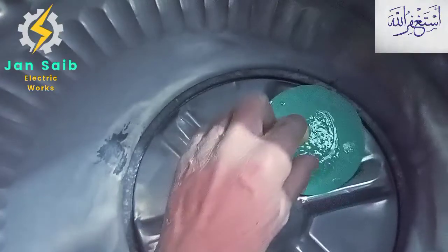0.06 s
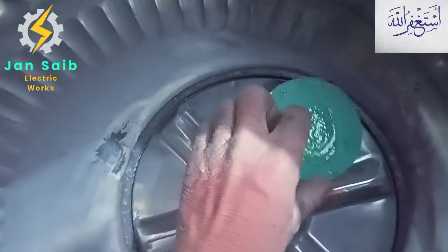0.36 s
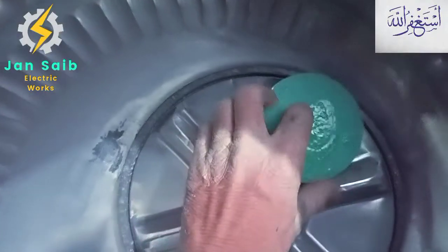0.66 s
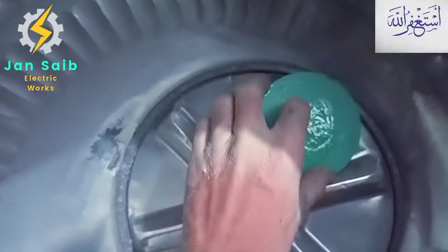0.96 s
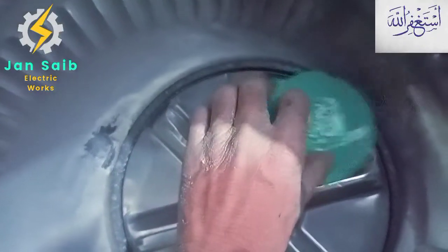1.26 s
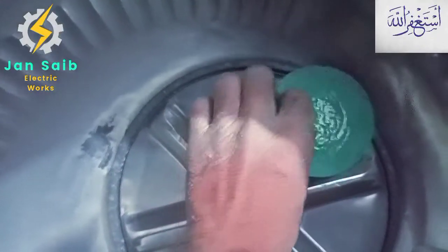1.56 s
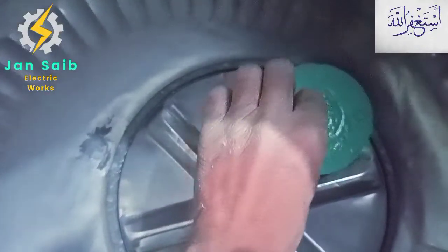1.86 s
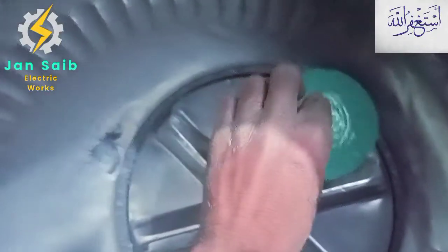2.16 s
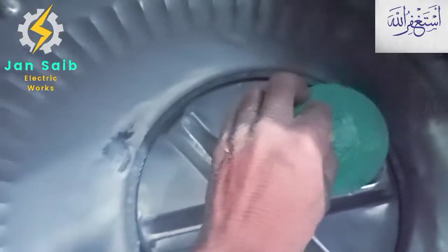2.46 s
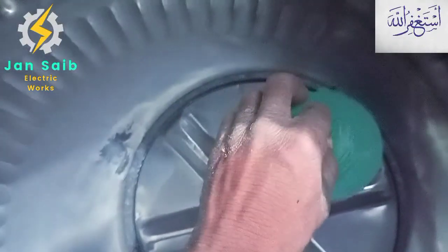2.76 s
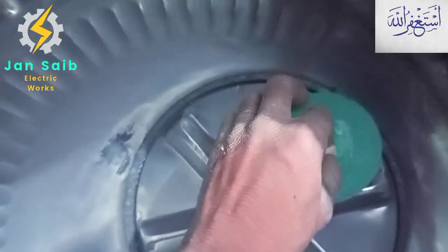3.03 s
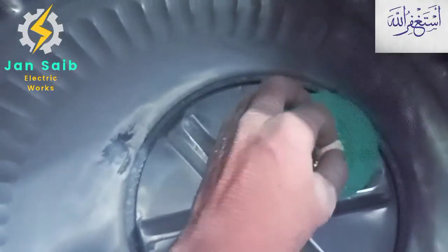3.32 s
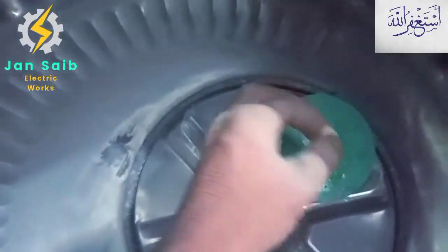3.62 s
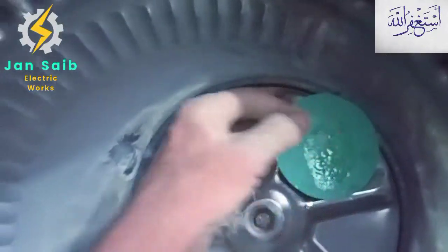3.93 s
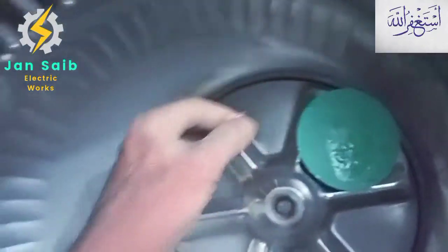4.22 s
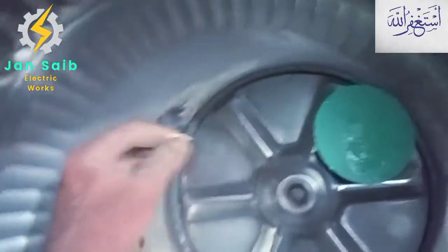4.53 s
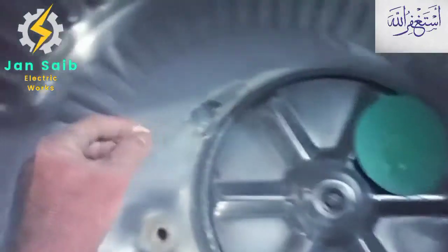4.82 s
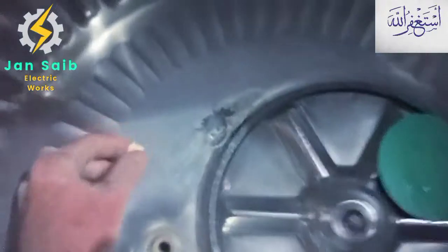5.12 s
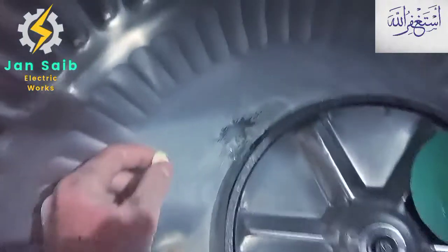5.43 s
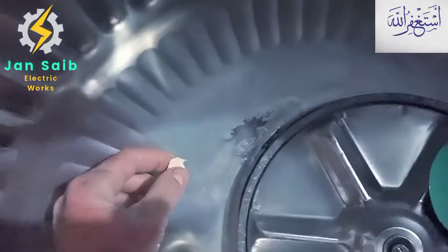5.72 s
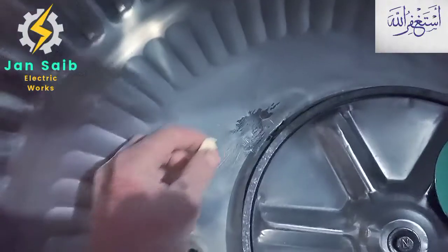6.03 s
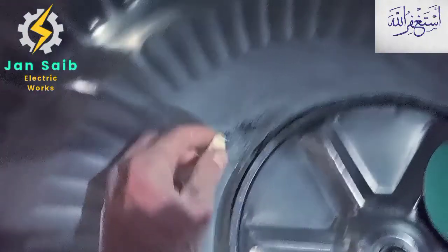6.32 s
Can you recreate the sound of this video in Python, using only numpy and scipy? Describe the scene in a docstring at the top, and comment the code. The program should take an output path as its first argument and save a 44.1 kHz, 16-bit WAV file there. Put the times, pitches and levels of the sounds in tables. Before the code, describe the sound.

Inside a washing machine drum, a hand shifts a plastic lid over the metal floor. It knocks, bounces and scrapes irregularly, with tiny groans, for about three seconds, ending in a quick clatter. The fingers slide off with a soft hiss and there is one sharp scuff. Then they quietly knead putty and press it on the metal, which booms softly. The microphone is close.

```python
"""Inside a washing machine drum, one close microphone. A hand shifts a plastic tub lid on the metal
floor: knocks and bounces ring the modes of lid, floor and rim; stick-slip makes it scrape and groan.
The fingers slide off with a soft hiss and there is one sharp scuff. They then knead epoxy putty
and press it on the metal, which booms softly."""
import sys
import numpy as np
from scipy import signal
from scipy.fft import rfft, irfft, next_fast_len
from scipy.io import wavfile

SR = 44100
rng = np.random.default_rng(int(sys.argv[2]) if len(sys.argv) > 2 else 0)


def store_pcm(level_fs):
    """Save levels as 16-bit WAV."""
    pcm = np.round(np.clip(level_fs, -1, 1) * 32767).astype(np.int16)
    wavfile.write(sys.argv[1], SR, np.atleast_2d(pcm).T)


N = 290178
TIME_S = np.arange(N) / SR
AGE_S = TIME_S[:SR * 6 // 10]  # time within one event

# Background spectrum (frequency [Hz], density [dB])
AIR_SPECTRUM = [(18, -37), (30, -9.5), (145, 6), (221, -5.5), (473, -3), (554, -9.5), (913, -18.5),
                (1160, -6.5), (2830, -16), (5900, -11.5), (7270, -24), (9970, -12), (16000, -30)]
# Floor under the hand, low to high (frequency [Hz], width [Hz], gain [dB])
FLOOR_THRUM = [(75.96, 18, 0)]
FLOOR_BOOM = [(110.7, 11, -2.5), (146.6, 31, 0), (176.5, 38, -1)]
FLOOR_RUMBLE = [(261.5, 15.9, 1.5), (378.4, 78, -4), (411, 81, -4.5), (489.75, 34, 6.5), (595, 99, -14),
                (705, 76, -6.5)]
# Hand leaning (start [s], end [s], first [dB], last [dB], thrum re boom [dB], rumble re boom [dB])
HAND_PRESSES = [(0.808, 0.977, -43, -68.5, -2.5, -10.5), (1.368, 1.6, -47.5, -67.5, 2, -20),
                (3.87, 3.945, -69, -66, -3, -8.5), (4.175, 4.301, -60.5, -57, -1.5, -10.5),
                (4.336, 4.58, -37, -45, -17.5, -7), (4.619, 4.803, -58, -61, -7.5, -35),
                (4.935, 5.246, -46, -53, -13.5, -8), (5.32, 5.55, -58.5, -63.5, -6.5, -15),
                (5.687, 5.912, -75.5, -66, -5.5, -9), (6.099, 6.35, -54, -63, 1.5, -6.5),
                (6.4, 6.587, -64.5, -69, -6.5, -12.5)]
# Soft pushes on the floor (time [s], level [dB])
HAND_PUSHES = [(4.316, -34.5), (4.92, -33), (5.32, -48), (6.199, -48), (6.301, -49.5)]
# Sliding skin (frequency [Hz], density [dB])
SKIN_SPECTRUM = [(290, -25.5), (500, -6), (640, -28.5), (708, 1.5), (880, -5), (1140, -11), (1300, -13),
                 (1440, -11.5), (2190, 0), (4400, -8), (6140, -16.5), (7530, -26), (16000, -28.5)]
# Drum cavity (frequency [Hz], width [Hz], gain [dB])
CAVITY_RESONANCES = [(711.1, 29, -2.5), (1003.8, 29, 9), (1177, 70, 3), (1282, 238, 5), (1539, 130, 3),
                     (1750, 167.4, -2), (1891.7, 140, -8), (2067.5, 54.3, -7.5), (2584, 170, -12),
                     (3441, 296, -15.5), (4660, 150, -14.5), (5593, 120, -8.5), (6007, 270, -9.5),
                     (10086, 240, -2.5)]
# Skin on the lid, fingers in putty (start [s], end [s], first [dB], last [dB], brightness [dB])
SKIN_RUBS = [(2.388, 2.42, -48, -54.5, 4), (2.43, 2.55, -70.5, -62.5, 0.5), (2.63, 2.83, -53.5, -68.5, 1),
             (3.44, 3.54, -50.5, -59, 3), (3.69, 3.77, -58, -42.5, 6.5), (3.745, 3.83, -41.5, -41, -26),
             (5.95, 5.98, -74.5, -71, 16)]
PUTTY_SQUEEZES = [(3.95, 4.11, -59, -61, -4.5), (4.32, 4.44, -58.5, -65, -5), (4.5, 4.57, -56, -64, -26),
                  (4.69, 4.89, -75.5, -78, 6.5), (4.915, 5.19, -53.5, -59, -3),
                  (5.055, 5.08, -42, -56.5, 2), (5.25, 5.44, -73, -73, 1.5), (5.63, 5.84, -69, -75, 6),
                  (5.98, 6.25, -72, -69.5, 7), (6.28, 6.56, -73.5, -81.5, 1)]
# Scuff noise (frequency [Hz], density [dB])
SCUFF_SPECTRUM = [(410, -24.5), (700, -12.5), (798, -17), (958, -4.5), (1300, -16.5), (2050, -5),
                  (2920, -10), (4670, -5), (6570, -3), (7590, -14.5), (9600, -3.5), (13500, -17.5),
                  (16000, -14.5)]
# Jerks of the scuff (time [s], gain [dB])
SCUFF_JERKS = [(4.149, -28), (4.163, -27)]
# Lid brushing the rim (start [s], release [s], frequency [Hz], gain [dB])
RIM_SQUEAL = (3.5, 3.5, 4025, -33.5)
# Stick-slip of the lid's edge (start [s], end [s], first pitch [Hz], last pitch [Hz], level [dB])
EDGE_GROANS = [(0.304, 0.328, 768.7, 777, -33.5), (0.392, 0.423, 771, 747, -32.5),
               (1.171, 1.177, 2074, 1984, -34), (1.247, 1.266, 770.3, 787.2, -30.5),
               (1.405, 1.424, 794, 745.5, -41.5), (1.585, 1.613, 770.2, 760, -33.5),
               (1.62, 1.714, 767.3, 751, -45.5), (2.071, 2.122, 773.7, 805.4, -45),
               (2.869, 2.954, 560.7, 632.8, -44.5)]
# Lid (frequency [Hz], width [Hz], gain [dB])
LID_RESONANCES = [(1200, 110, -7), (1666, 110, -4), (1917.2, 130, -3), (2073, 280, 0), (3174, 810, -14),
                  (3467.3, 170, -9), (3694, 150, -9.5), (4045, 170, -7), (4271, 200, -7), (4943, 380, -16),
                  (5310, 150, -11), (6020, 150, -1.5), (6626, 300, -8.5), (6940, 140, -9), (8531, 150, -10),
                  (9840, 750, -10.5), (11110, 660, -15), (12300, 450, -24), (15200, 1200, -22.5)]
# Lid on metal (start [s], end [s], first [dB], last [dB], treble re middle [dB], floor shudder [dB])
LID_DRAGS = [(0.0, 0.026, -21, -42.5, -2, -46), (0.083, 0.292, -49, -41.5, -2.5, -48),
             (0.328, 0.421, -54, -40, -0.5, -51.5), (0.501, 0.652, -42, -46, 1, -54),
             (0.832, 0.954, -59.5, -53, -3, -58), (1.038, 1.157, -47, -41.5, 1.5, -84),
             (1.178, 1.184, -17.5, -35.5, -2.5, -77.5), (1.301, 1.427, -33, -40.5, -1, -49),
             (1.575, 1.762, -43, -52, -1.5, -70.5), (1.817, 1.878, -66, -84.5, -25, -47),
             (1.971, 1.988, -58.5, -62, 5, -86), (1.996, 2.038, -42, -48.5, 6, -61),
             (2.069, 2.147, -37, -40.5, 5.5, -86.5), (2.193, 2.314, -46, -72, 1.5, -88),
             (2.56, 2.577, -49.5, -46, 11, -82), (2.863, 2.966, -53, -28.5, -3, -72)]
# Lid catching and jumping (time [s], surge re drag [dB])
LID_CATCHES = [(0.19, 3.5), (0.246, 5), (0.608, 2.5), (1.098, 9), (1.127, 2.5), (1.593, 3), (1.726, 0),
               (2.006, 15), (2.104, -6), (2.12, 2.5), (2.213, 6.5), (2.273, 11), (2.31, 12.5)]
# Dense small modes of the metal sheet (frequency [Hz], density [dB])
SHEET_SPECTRUM = [(35, -48), (60, -17), (227, -18), (363, -8), (651, -19.5), (785, -9.5), (1060, -19),
                  (1660, -4), (2770, -22.5), (4120, -15.5), (5590, -12), (6140, -15.5), (7400, -16),
                  (14900, -21.5), (16000, -25)]
# Lid and floor together; steel rim (frequency [Hz], level [dB], t60 [s])
BODY_MODES = [(79.3, -26, 0.9), (126, -18, 0.44), (165.2, -21, 0.32), (360.5, -8, 0.29), (484, -10.5, 0.22),
              (533.1, -15, 0.22), (748.4, -9, 0.23), (794, -1.5, 0.11), (953.6, -11.5, .14),
              (1213.5, -7.5, 0.15), (1291, 0, .1), (1530, -19.5, 0.052), (1612, -7, 0.19),
              (1710.7, 2.5, .13), (1898, -6, 0.28), (2094, -5, 0.04), (1936, -2.5, 0.099),
              (2058, -3.5, 0.067), (2378.5, -11, 0.26), (3490, -3.5, 0.062), (3930, -17, 0.14),
              (3957, -3, .06), (4695, -2, 0.079), (6050, -11.5, 0.24), (6186, 3.5, 0.041),
              (8510, -3.5, 0.079), (9560, -7.5, 0.07), (9430, -7, 0.064), (11000, -6, 0.054)]
RIM_MODES = [(1670, 0, .15), (4023, -4, .18), (6122, -2, .23), (6145, -3, .15), (6310, -3, .13),
             (6757, -3, .12), (6800, -7, .1)]
# Knocks reaching the rim (time [s], level [dB])
RIM_KNOCKS = [(2.574, -46), (3.186, -27), (3.25, -24), (3.274, -21.5), (3.369, -23)]
# Lid on floor (time [s], level [dB], bass re middle [dB], treble re middle [dB], bounces [count])
LID_KNOCKS = [(0.023, -24, -11, 2.5, 0), (0.035, -22.5, -9.5, -0.5, 0), (0.302, -30.5, -7.5, -1, 0),
              (0.368, -34.5, -6.5, 0.5, 1), (0.463, -19, -16.5, 0.5, 1), (0.541, -38.5, -4.5, 3.5, 0),
              (0.556, -28.5, -19, -4.5, 0), (0.667, -23.5, -7, -4, 1), (0.688, -21.5, -17.5, 0.5, 2),
              (0.782, -21, -14.5, -5.5, 0), (0.799, -30.5, -3.5, -12, 0), (0.962, -50.5, -7.5, 4, 0),
              (0.992, -56.5, -8, 6, 0), (1.208, -24.5, -13.5, 3, 0), (1.225, -26, -7.5, -3.5, 1),
              (1.254, -24, -7.5, -5, 1), (1.797, -38, -8, -9.5, 1), (2.573, -53, -25.5, 14, 0),
              (2.619, -39, -29.5, -5, 0), (2.785, -61.5, -12, 3, 0), (2.971, -27.5, -11.5, -10, 0),
              (2.986, -22, -14, -8, 1), (3.11, -44, -21.5, 1, 0), (3.127, -41, -21.5, 0.5, 0),
              (3.156, -47.5, -9, -2, 0), (3.184, -25, -8, 3, 0), (3.202, -24, -11.5, -4.5, 0),
              (3.249, -22, -20, 1, 0), (3.262, -22, -16.5, 1, 1), (3.359, -28.5, -6.5, 1, 0),
              (3.37, -23.5, -15.5, -1.5, 1)]


def from_db(db):
    """Decibels to gain."""
    return 10 ** (np.asarray(db) / 20)


def unit_rms(x):
    """Scale to rms 1."""
    return x / np.sqrt(np.mean(x ** 2) + 1e-20)


def unit_attack(x):
    """Scale to rms 1 over the first 20 ms."""
    return x / np.sqrt(np.mean(x[:SR // 50] ** 2) + 1e-20)


def decay(t60_s):
    """Exponential envelope."""
    return from_db(-60 * AGE_S / t60_s)


def band(x, low_hz, high_hz, order=3):
    """Causal band-pass."""
    edges_hz = [low_hz, min(high_hz, .48 * SR)]
    return signal.sosfilt(signal.butter(order, edges_hz, "band", fs=SR, output="sos"), x)


def noise(spectrum, size=len(AGE_S)):
    """Shaped noise, rms 1."""
    hz, db = np.transpose(spectrum)
    padded = next_fast_len(size)
    bins_hz = np.fft.rfftfreq(padded, 1 / SR)
    gain = from_db(np.interp(np.log(bins_hz + 1), np.log(hz), db))
    return unit_rms(irfft(rfft(rng.standard_normal(padded)) * gain, padded)[:size])


def drift(rate_hz):
    """Slow random curve, spread about 1."""
    knots = rng.standard_normal(4000)
    return np.interp(TIME_S * rate_hz, np.arange(len(knots)), knots)


def resonate(x, resonances, order=1):
    """Parallel resonators (frequency [Hz], width [Hz], gain [dB]), signs alternating."""
    out = 0
    for k, (hz, width_hz, db) in enumerate(resonances):
        r = np.exp(-np.pi * width_hz / SR)
        section = [(1 - r * r) / 2, 0, (r * r - 1) / 2, 1, -2 * r * np.cos(2 * np.pi * hz / SR), r * r]
        out = out + (-1) ** k * from_db(db) * signal.sosfilt([section] * order, x)
    return out


def moving_contact(x, resonances, spread_db, rate_hz):
    """A travelling contact varies the drive of each resonance."""
    return sum(resonate(x, [row], order=2) * from_db(spread_db * drift(rate_hz)) for row in resonances)


def add(out, time_s, sound):
    """Mix in at time_s."""
    start = max(round(time_s * SR), 0)
    out[start:start + len(sound)] += sound[:N - start]


def stroke(start_s, end_s, first_db, last_db, attack_s, release_t60_s):
    """Gain of one movement: attack, dB ramp, release."""
    attack = 1 - np.exp(-np.maximum(TIME_S - start_s, 0) / attack_s)
    ramp_db = np.interp(TIME_S, [start_s, end_s], [first_db, last_db])
    release_db = 60 * np.maximum(TIME_S - end_s, 0) / release_t60_s
    return attack * from_db(np.maximum(ramp_db - release_db, -200))


def friction(slips_per_s, size_db, clump_db, clump_hz):
    """Tiny slips of unequal size, in clumps."""
    slips = (rng.random(N) < slips_per_s / SR) * rng.choice([-1, 1], N)
    sizes_db = size_db * np.minimum(rng.exponential(1, N), 4) + clump_db * drift(clump_hz)
    return unit_rms(slips * from_db(sizes_db)) + 1e-18


def air(level_db=-72):
    """Faint steady background noise."""
    return from_db(level_db) * noise(AIR_SPECTRUM, N)


def pressing():
    """Hand judder and soft pushes set the floor booming."""
    out = np.zeros(N)
    judder = friction(slips_per_s=1200, size_db=2, clump_db=1.5, clump_hz=30)
    thrum, boom, rumble = (
        unit_rms(resonate(judder, floor, order=2) + from_db(-10) * resonate(judder, floor))
        for floor in (FLOOR_THRUM, FLOOR_BOOM, FLOOR_RUMBLE))
    for *ramp, thrum_db, rumble_db in HAND_PRESSES:
        gain = stroke(*ramp, attack_s=.0095, release_t60_s=.395)
        out += gain * (from_db(thrum_db) * thrum + boom + from_db(rumble_db) * rumble)
    force = AGE_S * np.exp(-AGE_S / .00158)
    thud = unit_attack(band(resonate(force, FLOOR_BOOM), 70, 260, order=2))
    for time_s, db in HAND_PUSHES:
        add(out, time_s, from_db(db) * thud)
    return out


def wall_echo(x, t60_s, wet_db):
    """The metal walls add a short, dense echo."""
    response = rng.standard_normal(len(AGE_S)) * decay(t60_s)
    echo = signal.fftconvolve(x, response / np.linalg.norm(response))[:N]
    return unit_rms(x + from_db(wet_db) * echo)


def skin_and_putty():
    """Fine sliding hiss rings in the cavity; sticky putty has more top than dry skin."""
    out = np.zeros(N)
    slide = noise(SKIN_SPECTRUM, N) * from_db(3.87 * drift(rate_hz=70))
    cavity = moving_contact(slide, CAVITY_RESONANCES, spread_db=2.5, rate_hz=14)
    hiss = wall_echo(cavity + from_db(-10) * slide, t60_s=.11, wet_db=1)
    middle, upper, top = (unit_rms(band(hiss, *edges_hz))
                          for edges_hz in [(720, 2200), (2200, 6500), (6500, 17000)])
    for moves, top_db, attack_s, release_t60_s in [(SKIN_RUBS, -20, .00914, .2374),
                                                   (PUTTY_SQUEEZES, -1, .0262, .397)]:
        sheen = upper + from_db(top_db) * top
        for *ramp, bright_db in moves:
            out += stroke(*ramp, attack_s, release_t60_s) * (middle + from_db(bright_db) * sheen)
    return out


def scuff(attack_s=.00347):
    """Two bright noise bursts; the top dies first."""
    out = np.zeros(N)
    for time_s, db in SCUFF_JERKS:
        burst = noise(SCUFF_SPECTRUM) * (1 - np.exp(-AGE_S / attack_s))
        body = band(burst, 307, 4556) * decay(t60_s=.366)
        top = band(burst, 6040, 23000) * decay(t60_s=.1233)
        add(out, time_s, from_db(db) * (body + from_db(10.5) * top))
    return out


def rim_squeal():
    """One rubbed rim mode swells briefly and dies."""
    start_s, release_s, hz, db = RIM_SQUEAL
    gain = stroke(start_s, release_s, db, db, attack_s=.012, release_t60_s=.16)
    return np.sqrt(2) * gain * np.sin(2 * np.pi * hz * TIME_S)


def groans(attack_s=.007, release_t60_s=.11):
    """The lid's edge sticks and slips: a rough, wavering tone that rings out."""
    out = np.zeros(N)
    for start_s, end_s, first_hz, last_hz, db in EDGE_GROANS:
        length_s = end_s - start_s
        release = from_db(-60 * np.maximum(AGE_S - length_s, 0) / release_t60_s)
        swell = (1 - np.exp(-AGE_S / attack_s)) * release
        waver = 1 + .026 * drift(rate_hz=220)[:len(AGE_S)]
        flutter = from_db(3.2 * drift(rate_hz=130)[:len(AGE_S)])
        pitch_hz = np.interp(AGE_S, [0, length_s], [first_hz, last_hz]) * waver
        phase = 2 * np.pi * np.cumsum(pitch_hz) / SR
        tone = np.sin(phase) + from_db(-12) * np.sin(2 * phase) + from_db(-13) * np.sin(3 * phase)
        add(out, start_s, np.sqrt(2) * from_db(db) * flutter * swell * tone)
    return out


def drags(attack_s=.015, release_t60_s=.1):
    """Dense slips ring the lid and shake the floor; each catch is a short surge."""
    middle_gain, treble_gain, shudder_gain = np.zeros((3, N))
    for start_s, end_s, first_db, last_db, treble_db, shudder_db in LID_DRAGS:
        gain = stroke(start_s, end_s, first_db, last_db, attack_s, release_t60_s)
        middle_gain += gain
        treble_gain += gain * from_db(treble_db)
        shudder_gain += stroke(start_s, end_s, shudder_db, shudder_db, attack_s, release_t60_s)
    catch_gain = np.ones(N)
    surge = (1 - np.exp(-AGE_S / .0015)) * decay(t60_s=.061)
    for time_s, db in LID_CATCHES:
        add(catch_gain, time_s, from_db(db) * surge)
    slips = friction(slips_per_s=4500, size_db=3.5, clump_db=3, clump_hz=140)
    rasp = moving_contact(slips, LID_RESONANCES, spread_db=3, rate_hz=30) + from_db(-22) * slips
    low = resonate(slips, [(807, 89, 8), (481, 50, -22), (369.4, 32, -18), (134, 160, -17.5)], order=2)
    shudder = resonate(slips, [(135, 90, -5.5), (255, 60, -6.5), (349.6, 70, 0), (471, 70, .5)], order=2)
    middle = unit_rms(band(rasp, 1000, 2600)) + from_db(-19.5) * unit_rms(low)
    treble = unit_rms(band(rasp, 2900, 17000))
    return catch_gain * (middle_gain * middle + treble_gain * treble) + shudder_gain * unit_rms(shudder)


def strike(modes, spread_db):
    """Damped sines; each contact point gives them random strengths and signs."""
    waves = [from_db(db) * np.sin(2 * np.pi * hz * AGE_S) * decay(t60_s) for hz, db, t60_s in modes]
    weights = from_db(spread_db * rng.standard_normal(len(modes))) * rng.choice([-1, 1], len(modes))
    return unit_attack(weights @ np.array(waves))


def clack(t60_s, tail_t60_s, tail_db):
    """Dense sheet modes as noise: fast decay, faint tail."""
    return unit_attack(noise(SHEET_SPECTRUM) * (decay(t60_s) + from_db(tail_db) * decay(tail_t60_s)))


def sheet_clacks():
    """Clacks for bass, middle and treble; the lid colours the treble."""
    bright = clack(t60_s=.096, tail_t60_s=.34, tail_db=-19.5)
    bass = clack(t60_s=.22, tail_t60_s=.64, tail_db=-9)
    middle = clack(t60_s=.11, tail_t60_s=.44, tail_db=-14.5)
    treble = unit_attack(resonate(bright, LID_RESONANCES, order=2) + from_db(-15) * bright)
    return np.array([bass, middle, treble])


def knocks(bounce_s=.011, bounce_loss_db=5, crack_gain_db=-2.5):
    """Lid hits floor: a crack, then body modes and sheet clack per contact. A few ring the rim."""
    out = np.zeros(N)
    common = sheet_clacks()
    snap = 1 + from_db(-7) * decay(t60_s=.085)  # the first swing dies fastest
    for time_s, db, bass_db, treble_db, bounces in LID_KNOCKS:
        crack = band(noise(SHEET_SPECTRUM) * decay(t60_s=.014), 500, 17000)
        add(out, time_s, from_db(db + crack_gain_db) * crack)
        for k in range(round(bounces) + 1):
            body = strike(BODY_MODES, spread_db=3)
            low, mid, high = (common + sheet_clacks()) / np.sqrt(2)  # half varies with landing point
            bass = unit_attack(band(body + from_db(-2.5) * low, 72, 670, order=4))
            middle = unit_attack(band(body + from_db(2) * mid, 530, 2800) * snap)
            treble = unit_attack(band(body + from_db(1.5) * high, 2100, 17000) * snap)
            contact = from_db(bass_db) * bass + middle + from_db(treble_db) * treble
            add(out, time_s + k * bounce_s, from_db(db - k * bounce_loss_db) * contact)
    for time_s, db in RIM_KNOCKS:
        add(out, time_s, from_db(db) * strike(RIM_MODES, spread_db=-5.5))
    return out


def scene():
    """All sources at one microphone, both channels alike."""
    mono = knocks() + drags() + groans() + rim_squeal() + skin_and_putty() + scuff() + pressing() + air()
    return np.array([mono, mono])


def record(dry):
    """Top-end colour: a peak near 14.4 kHz, a dip near 13.7 kHz, then a steep 16 kHz low-pass."""
    peak = resonate(dry, [(14400, 1400, -1)])
    dip = resonate(dry, [(13700, 650, -2)])
    cutoff_hz = 16000
    return signal.sosfilt(signal.ellip(10, .2, 80, cutoff_hz, fs=SR, output="sos"), dry + peak - dip)


dry = scene()
out = record(dry)
store_pcm(out)
```